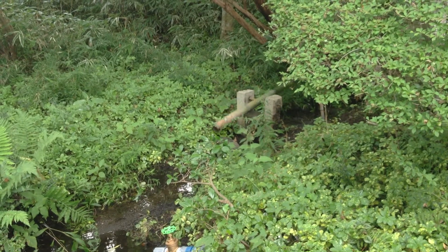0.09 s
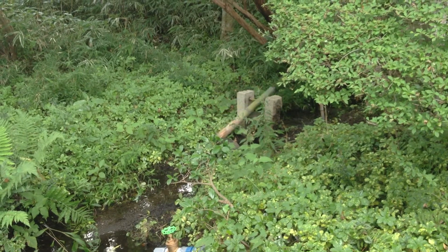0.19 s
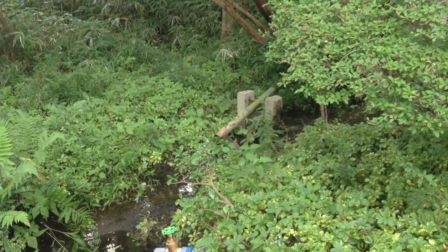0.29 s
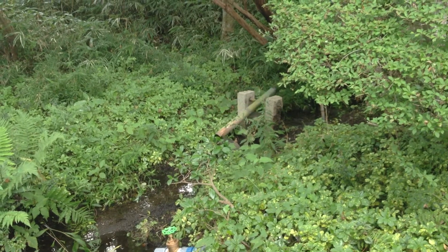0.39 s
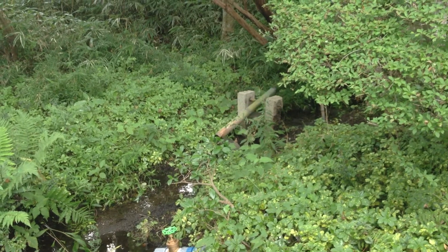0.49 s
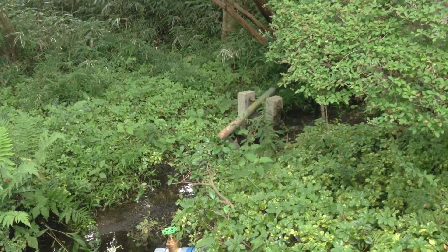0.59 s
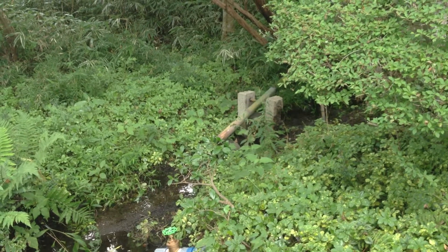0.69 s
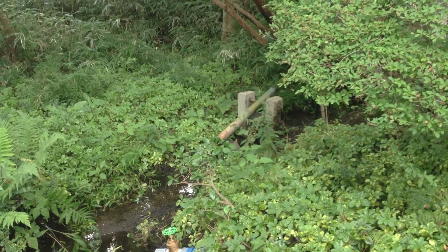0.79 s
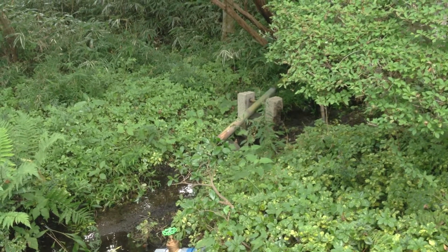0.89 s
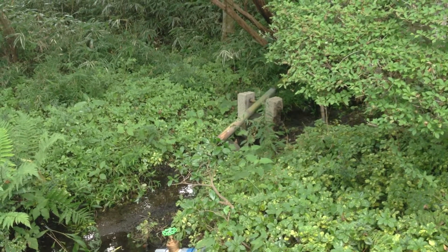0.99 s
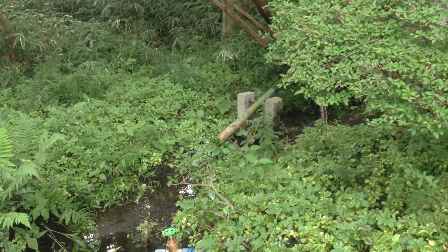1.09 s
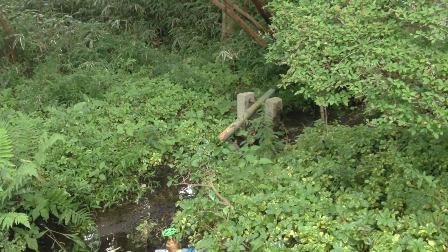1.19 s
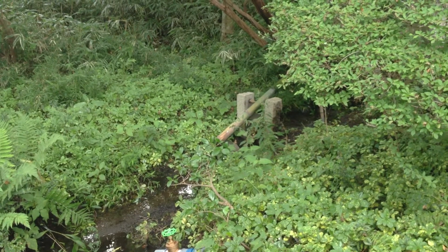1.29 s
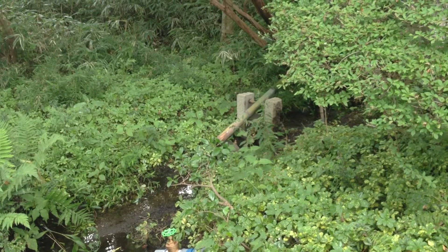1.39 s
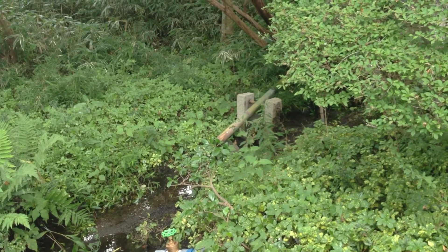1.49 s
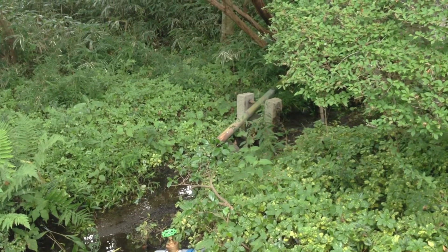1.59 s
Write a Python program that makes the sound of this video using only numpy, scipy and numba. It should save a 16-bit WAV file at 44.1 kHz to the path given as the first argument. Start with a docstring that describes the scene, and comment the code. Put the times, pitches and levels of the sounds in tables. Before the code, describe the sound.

Bamboo tube knocking on stone in a garden: faint low drips at 0.1 and 0.15 seconds, then a loud, dry, woody clatter at 0.25, a quick weaker rattle until 0.37, a duller soft bounce at 0.67 and barely audible taps to 0.8. Short leafy echoes follow. Throughout, a high cicada buzz flutters about twelve times a second over distant insect hiss and quiet stream; tiny drips at 0.58 and from 1.08 to 1.5.

```python
"""A cicada buzzes from start to end, swinging about twelve times a second, over a chorus and a quiet stream.
After two soft drips, a bamboo deer scarer falls on its stone: a hard clattering knock, then a rattle.
A softer bounce and some faint taps follow, with more drips around them. Decaying tones and cracks make
the bamboo, with echoes from the foliage; clicks through moving resonances make the buzz. Coloured noise
makes the stream and the chorus hiss, and short tones that rise in pitch make the drips."""
import sys
import numpy as np
from scipy import signal
from scipy.fft import rfft, irfft
from scipy.io import wavfile
from numba import njit

SR = 44100
rng = np.random.default_rng(int(sys.argv[2]) if len(sys.argv) > 2 else 0)


def inscribe(sig):
    """Save sig as 16-bit PCM at rate SR to the path in sys.argv[1].

    A 1-D sig is mono; a 2-D sig holds one channel per row.
    Samples are clipped to [-1, 1] before scaling.
    """
    pcm = np.round(np.clip(np.atleast_2d(sig).T, -1, 1) * 32767)
    wavfile.write(sys.argv[1], SR, pcm.astype(np.int16))


N = 70560  # length in samples: 1.6 s


def undb(db):
    """Turn decibels into a gain."""
    return 10 ** (np.asarray(db) / 20)


def unit(x):
    """Scale a sound to an average strength (rms) of 1."""
    return x / np.sqrt(np.mean(x ** 2))


def fade(t60):
    """Die away smoothly from time zero, falling 60 dB in t60 seconds."""
    return np.exp(-np.log(1000) * np.arange(N) / SR / t60)


def delayed(x, seconds):
    """Start the sound some seconds later."""
    silence = np.zeros(max(int(seconds * SR), 0))
    return np.concatenate([silence, x])[:N]


def above(x, hz, order=1):
    """Keep the part of a sound above a frequency (high-pass filter)."""
    return signal.sosfilt(signal.butter(order, hz, "high", fs=SR, output="sos"), x)


def noise(points):
    """Make noise of rms 1, coloured by (frequency [Hz], level [dB]) points."""
    hz, db = np.array(points).T
    f = np.maximum(np.fft.rfftfreq(N, 1 / SR), 1)
    gain = undb(np.interp(np.log(f), np.log(hz), db))
    return unit(irfft(rfft(rng.standard_normal(N)) * gain, N))


def echoes(x, db, t60, delay):
    """Blur a sound into many fading reflections, using decaying noise as the echo pattern."""
    tail = delayed(rng.standard_normal(N) * fade(t60), delay)
    tail /= np.sqrt(np.sum(tail ** 2))
    return undb(db) * signal.fftconvolve(x, tail)[:N]


@njit
def resonance(x, hz, width):
    """Ring at a frequency that may move every sample; a larger width [Hz] rings for less time."""
    y, z = np.empty(len(x)), 0j
    for i in range(len(x)):
        # the tiny constant keeps the ringing from reaching very slow-to-compute small numbers
        z = z * np.exp((2j * hz[i] - width) * np.pi / SR) + x[i] + 1e-18
        y[i] = z.real
    return y


# contacts of tube and stone:
# (time [s], level [dB], brightness limit [Hz], extra crack level [dB], body level [dB])
CONTACTS = [(0.2461, -15, 8060, 6.5, 1.5), (.2497, 2.5, 2600, -6, -1.5), (0.2544, -13, 8760, 15, -3.5),
            (0.2601, -8, 5000, 2, -7.5), (.2930, -20.5, 3950, -5, -10), (0.2973, -20, 5130, 9, -6),
            (.3525, -32.5, 2220, 9, -9), (0.3569, -17.5, 2100, 1.5, 3), (0.3664, -19.5, 1710, 3, -6.5),
            (0.6732, -24, 1770, 5.5, 7.5), (0.6764, -12.5, 1500, -0.5, 4), (.6960, -29, 2530, 11.5, -4.5),
            (.7040, -29, 2300, 10, -9), (.7865, -37, 650, 16, -8), (.7970, -34, 758, 7, -1)]
# ringing tones of the tube and its air column: (frequency [Hz], level [dB], time to fade 60 dB [s])
TUBE_MODES = [(181, -30, .06), (245, -39, 0.7), (399, -31.5, 0.24), (604, -24, 0.081), (727, -29, 0.22),
              (1052, -13.5, 0.072), (1180.5, -16.5, 0.053), (1269, -23, 0.084), (1420, -16, 0.037),
              (1724, -22, 0.11), (1774, -27.5, 0.13), (2139, -29, .06), (2188, -18.5, 0.058),
              (2295, -25, 0.048)]
# colour of the crack of a contact: (frequency [Hz], relative level [dB])
CRACK_COLOUR = [(60, -38.5), (170, -4), (300, -11), (550, -1), (850, -8), (1150, 6), (1600, -2),
                (2300, 3.5), (3100, -5), (4000, -3), (5200, -9), (6600, -3), (8000, -6), (9300, -17.5),
                (15000, -5.5)]
CRACK_DB, CRACK_RISE_S, CRACK_T60_S, CRACK_LOW_HZ = -7.5, 0.00077, 0.049, 173
BODY_TOP_HZ = 500  # tones below this belong to the body, the others to the wall


def bamboo():
    """Each contact rings the tube and adds a short crack; how bright and how full it is varies."""
    t = np.arange(N) / SR
    body, wall = np.zeros(N), np.zeros(N)
    for k, (hz, db, t60) in enumerate(TUBE_MODES):
        sign = (-1) ** k  # every other tone starts downwards
        tone = sign * undb(db) * fade(t60) * np.sin(2 * np.pi * hz * t)
        if hz < BODY_TOP_HZ:
            body += tone
        else:
            wall += tone
    burst = (1 - np.exp(-t / CRACK_RISE_S)) * fade(CRACK_T60_S)
    out = np.zeros(N)
    for start, db, bright_hz, crack_db, body_db in CONTACTS:
        crack = above(noise(CRACK_COLOUR) * burst, CRACK_LOW_HZ, order=4)
        blow = wall + undb(body_db) * body + undb(CRACK_DB + crack_db) * crack
        dulling = signal.butter(2, bright_hz, fs=SR, output="sos")
        out += undb(db) * delayed(signal.sosfilt(dulling, blow), start)
    return above(out, 150, order=2)


# nearby stones and leaves
SCATTER_DB, SCATTER_T60_S, SCATTER_DELAY_S, SCATTER_LOW_HZ = -8.5, 0.22, .005, 583
CANOPY_DB, CANOPY_T60_S, CANOPY_LOW_HZ = -6, .25, 8250  # leaves overhead
GARDEN_DB, GARDEN_T60_S, GARDEN_LOW_HZ = -21.5, 0.9, 1980  # trees further off


def garden(x):
    """Add close scatter, a bright wash from the leaves and a faint long tail from the trees."""
    close = echoes(above(x, SCATTER_LOW_HZ), SCATTER_DB, SCATTER_T60_S, SCATTER_DELAY_S)
    canopy = echoes(above(x, CANOPY_LOW_HZ, order=2), CANOPY_DB, CANOPY_T60_S, .015)
    trees = echoes(above(x, GARDEN_LOW_HZ, order=2), GARDEN_DB, GARDEN_T60_S, .03)
    return x + close + canopy + trees


# swings of the cicada's abdomen: (time [s], rate [swings per s])
ABDOMEN_SWING = [(0, 11.1), (.5, 11.72), (1.6, 11.72)]
SWING_CREST_S = .497  # a moment when the swing is at its top
SWING_SQUARENESS = 3.4  # higher values linger longer at top and bottom


def abdomen_lift():
    """The abdomen swings between trough (0) and crest (1), lingering at both ends."""
    t = np.arange(N) / SR
    turns = np.cumsum(np.interp(t, *np.array(ABDOMEN_SWING).T)) / SR
    swing = np.cos(2 * np.pi * (turns - np.interp(SWING_CREST_S, t, turns)))
    squared = np.tanh(SWING_SQUARENESS * swing) / np.tanh(SWING_SQUARENESS)
    return np.clip(.5 + .5 * squared, 0, 1)


# clicks of the tymbal, the cicada's drum skin: (time [s], rate [Hz])
TYMBAL_RATE = [(0, 297.4), (.5, 301.1), (1.6, 301.3)]
WEAK_CLICK_DB, WEAK_CLICK_LATE_S = -3.5, .00022
CLICK_SCATTER_DB, CLICK_JITTER_S = 1, .00002  # random spread of level and timing


def tymbal_clicks():
    """The tymbal gives strong and weak clicks in turn, slightly uneven in time and level."""
    t = np.arange(N) / SR
    cycles = np.cumsum(np.interp(t, *np.array(TYMBAL_RATE).T)) / SR
    beats = np.flatnonzero(np.diff(np.floor(cycles)))
    late, size = rng.standard_normal((len(beats), 2)).T
    weak = np.arange(len(beats)) % 2
    shift_s = late * CLICK_JITTER_S + weak * WEAK_CLICK_LATE_S
    at = np.clip(beats + np.round(shift_s * SR).astype(int), 0, N - 1)
    clicks = np.zeros(N)
    clicks[at] = undb(CLICK_SCATTER_DB * size + WEAK_CLICK_DB * weak)
    return clicks


# resonances of the cicada: (frequency at trough [Hz], frequency at crest [Hz], width of first pass [Hz],
# level at trough [dB], level at crest [dB], bend of the sweep [power])
CICADA_RESONANCES = [(6112, 7294, 450, -51, -55.5, 1.33), (12000, 14750, 1800, -59.5, -50.5, 1.34)]
CICADA_ECHO_DB, CICADA_ECHO_T60_S = -2.5, 0.12


def cicada():
    """Tymbal clicks ring two resonances whose pitch and level swing with the abdomen."""
    lift, clicks = abdomen_lift(), tymbal_clicks()
    out = np.zeros(N)
    for low_hz, high_hz, width, low_db, high_db, bend in CICADA_RESONANCES:
        hz = low_hz + (high_hz - low_hz) * lift ** bend
        first_pass = resonance(clicks, hz, 1. * width)
        buzz = resonance(first_pass, hz, 2. * width)
        out += unit(buzz) * undb(low_db + (high_db - low_db) * lift)
    return out + echoes(out, CICADA_ECHO_DB, CICADA_ECHO_T60_S, .001)


# colour of the distant cicadas: (frequency [Hz], relative level [dB])
CHORUS_COLOUR = [(4000, -37.5), (5180, -23.5), (5380, -5.5), (6200, 6), (7000, -6), (8050, 0),
                 (8650, -32.5), (10000, -31.5), (11500, -3), (13000, -10.5), (15300, -12)]
CHORUS_DB = -52.5
WHINE_HZ, WHINE_WIDTH_HZ, WHINE_DB = 5356, 24, -64.5  # one far insect on a steady note


def chorus():
    """Distant cicadas blend into a hiss, with one thin note, ringing noise, at its lower edge."""
    hiss = noise(CHORUS_COLOUR)
    whine = resonance(rng.standard_normal(N), np.full(N, 1. * WHINE_HZ), 1. * WHINE_WIDTH_HZ)
    return undb(CHORUS_DB) * hiss + undb(WHINE_DB) * unit(whine)


# colour of the running water: (frequency [Hz], relative level [dB])
STREAM_COLOUR = [(25, -20), (60, -8), (100, 0), (200, 3.5), (400, -1.5), (900, -3), (1700, -8.5),
                 (2500, -2), (3500, -12), (5000, -6.5), (9000, -15.5), (15000, -16)]
STREAM_DB = -60
# drips: (time [s], starting frequency [Hz], level [dB], time to fade 60 dB [s])
DRIP_LIST = [(.106, 748, -47, 0.058), (.148, 804, -54, 0.067), (.576, 3370, -47, 0.014),
             (1.079, 1855, -53.5, 0.043), (1.277, 2400, -58, .09), (1.244, 3840, -56, 0.017),
             (1.417, 4500, -54.5, 0.034), (1.475, 1142, -50.5, .05)]
DRIP_RISE_PER_S = 1.5  # pitch gained each second, as a share of the starting pitch


def stream():
    """Coloured noise is the wash of water; each drip is a bubble, a fading tone rising in pitch."""
    t = np.arange(N) / SR
    drips = np.zeros(N)
    for start, hz, db, t60 in DRIP_LIST:
        cycles = hz * t * (1 + DRIP_RISE_PER_S * t / 2)
        bubble = undb(db) * fade(t60) * np.sin(2 * np.pi * cycles)
        drips += delayed(bubble, start)
    return undb(STREAM_DB) * noise(STREAM_COLOUR) + garden(drips)


def scene():
    """Mix the tube in its garden, one near cicada, the distant chorus and the stream."""
    return (garden(bamboo()) + cicada() + chorus() + stream())[None]


TOP_HZ = 15200


def record(dry):
    """The recorder cuts the deep bass and the top."""
    bass_cut = signal.butter(2, 80, "high", fs=SR, output="sos")
    top_cut = signal.ellip(12, .2, 70, TOP_HZ, fs=SR, output="sos")
    return signal.sosfilt(top_cut, signal.sosfilt(bass_cut, dry))


dry = scene()
out = record(dry)
inscribe(out)
```